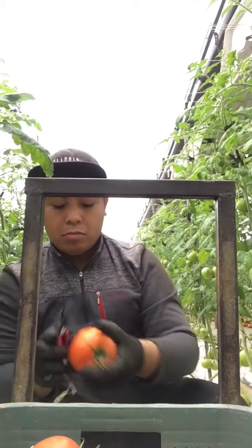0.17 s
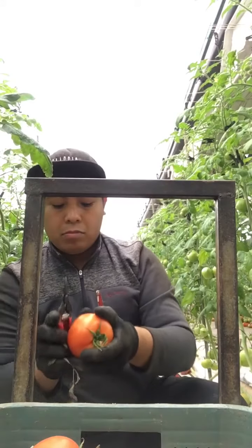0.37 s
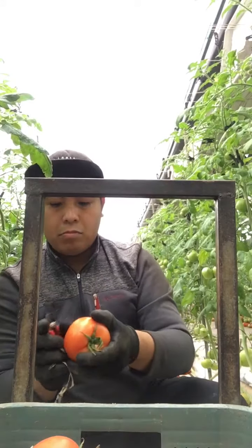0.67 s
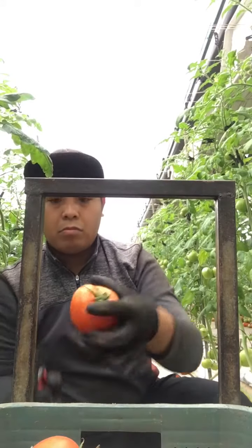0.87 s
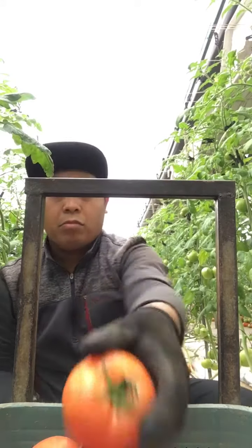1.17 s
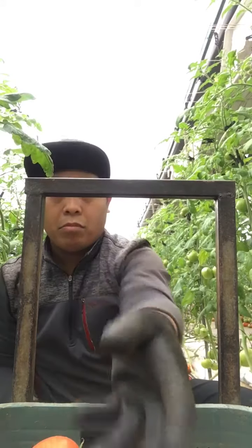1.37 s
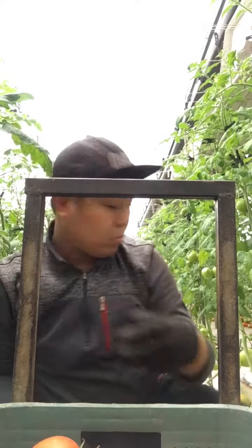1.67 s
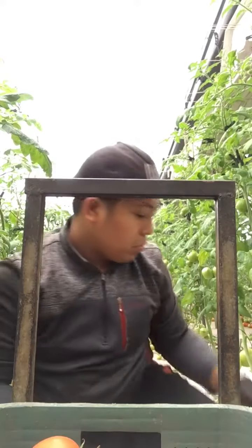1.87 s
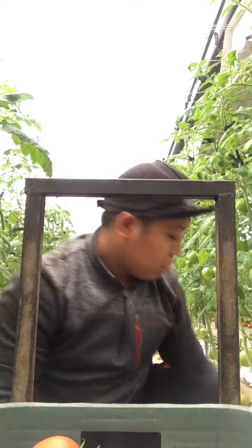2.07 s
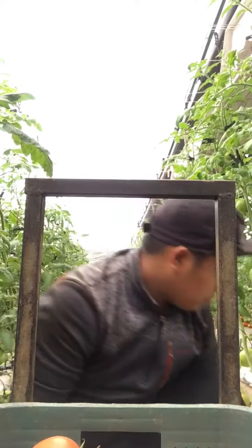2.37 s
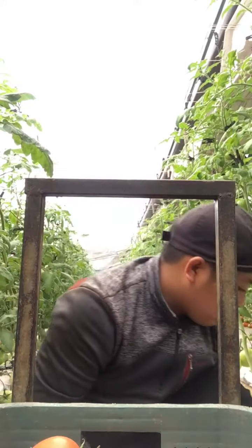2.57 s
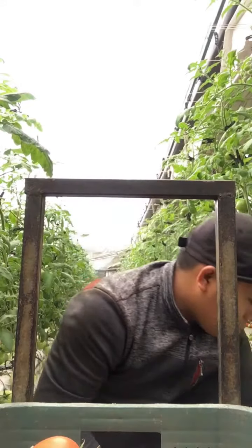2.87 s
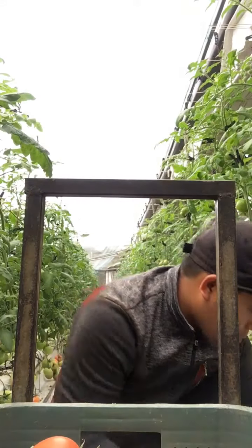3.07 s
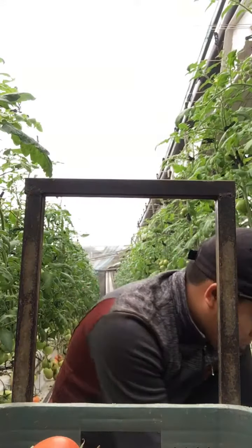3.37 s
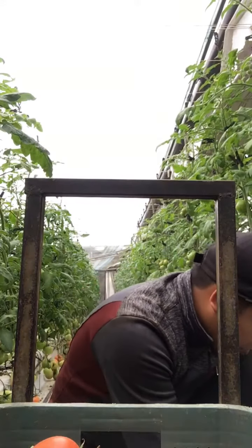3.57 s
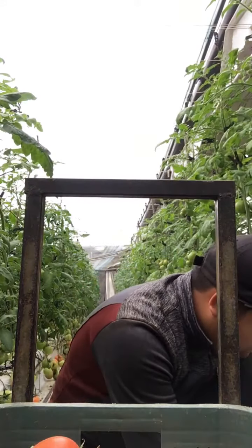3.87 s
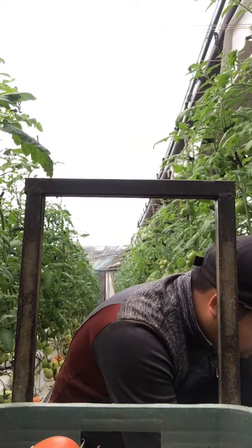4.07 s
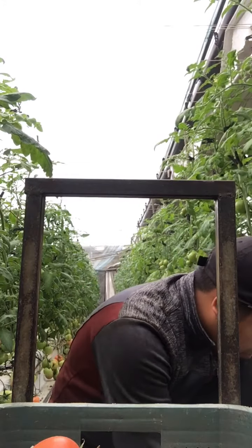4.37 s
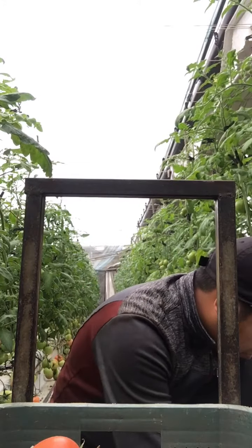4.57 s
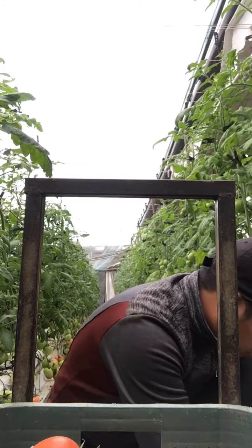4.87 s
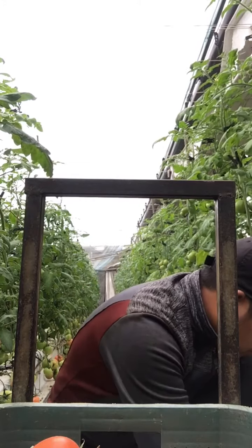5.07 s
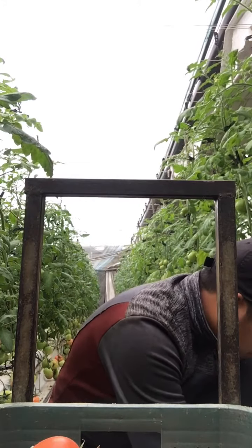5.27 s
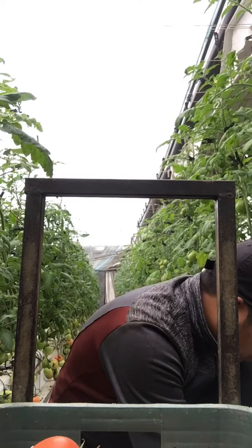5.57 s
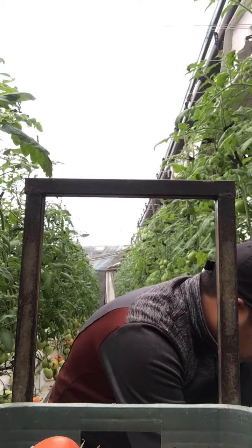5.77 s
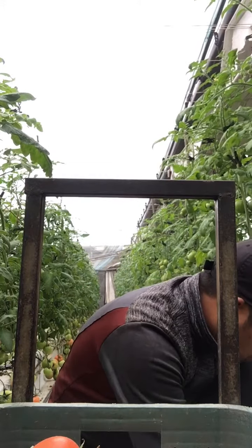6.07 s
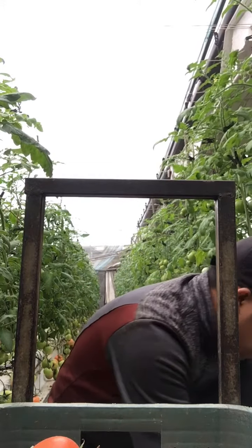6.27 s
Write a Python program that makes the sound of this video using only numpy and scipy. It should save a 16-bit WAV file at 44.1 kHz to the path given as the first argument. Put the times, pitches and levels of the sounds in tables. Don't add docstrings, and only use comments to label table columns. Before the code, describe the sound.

A low, steady fan hum with lumpy rumble runs throughout a greenhouse, picked up close by a phone resting on a plastic crate. From 0 to 1.3 s gloves and sleeves rub softly, with small dry ticks at 0.3 and 0.7 s and a sharper one at 1.3 s. A stalk taps at 1.4 s, then a tomato lands: a deep boomy thud peaking near 1.5 s, the crate chattering in weaker knocks until about 1.7 s. Glove scrapes follow to 2.0 s. From 2.3 to 3.25 s the whole background sinks, with faint leaf rustle, then returns with a light tick. At 4.2 s shears snip: a bright snapping crack with brief blade ring. Leaf brushing, slides and ticks fill 4.3 to 5.2 s, then quieter rustling. A second crisp snip falls at 6.02 s, followed by a last leafy brush around 6.27 s.

```python
import sys
import numpy as np
from scipy import signal
from scipy.io import wavfile
from scipy.ndimage import uniform_filter1d

SR = 44100
rng = np.random.default_rng(int(sys.argv[2]) if len(sys.argv) > 2 else 0)


def waveform_to_disk(signal):
    frames = np.transpose(np.atleast_2d(signal))
    scaled = np.clip(frames, -1, 1) * 32767
    samples = np.round(scaled).astype(np.int16)
    wavfile.write(sys.argv[1], SR, samples)


def magnitude_from_level(level_db):
    exponent = np.asarray(level_db, float) / 20
    return 10 ** exponent


N = 282681
DIP_DB = -9


def evened(x):
    return x / np.sqrt(np.mean(x ** 2) + 1e-20)


def read(points, hz):
    f, value = np.transpose(points)
    return np.interp(np.log(hz + 1), np.log(f + 1), value)


def add(mix, s, sound):
    part = mix[round(s * SR):][:len(sound)]
    part += sound[:len(part)]


def noise(field_db, size):
    hz = np.fft.rfftfreq(size, 1 / SR)[:, None]
    t = np.arange(4 * N // size + 5) * size / 4 / SR
    a, b = rng.standard_normal((len(t), len(hz), 2)).T
    gain = magnitude_from_level(field_db(hz, t))
    return signal.istft((a + 1j * b) * gain, nperseg=size, noverlap=3 * size // 4)[1][:N]


def dip(t):
    from_s, to_s, edge_s = 2.3375, 3.2535, 0.02
    return np.clip(np.minimum(t - from_s, to_s - t) / edge_s + .5, 0, 1)


def port_db(hz):
    # pitch_hz [Hz], width_hz [Hz], level_db [dB]
    resonances = [(1902, 480, -2.5), (2650, 470, 3.5), (4500, 330, 5), (4890, 280, -5), (6310, 720, 5),
                  (8890, 420, 5), (10460, 540, -13.5)]
    return sum(db / (1 + (2 * (hz - f) / w) ** 2) for f, w, db in resonances)


def hum():
    # pitch_hz [Hz], density_db [dB per Hz]
    fan_colour = [(30, -33), (70, -14.5), (115, -10.5), (190, -13.5), (300, -19), (450, -22), (800, -21.5),
                  (1030, -20.5), (1300, -25), (2000, -30.5), (3200, -43.5), (6400, -51.5), (9000, -55),
                  (16000, -58)]
    # middle_s [s], extra_db [dB], half_width_s [s]
    gusts = [(.2, 4, 0.22), (.8, 1, .15), (1.41, 0.5, 0.086), (1.62, 11, 0.14), (1.88, 1.5, 0.13),
             (2.25, -2, 0.11), (3.26, 5, .06), (3.6, 2, .15), (5.1, 3, 0.54), (5.82, 2, 0.13),
             (6.41, 6, 0.17)]
    fans_db, rumble_db = -55.5, -54.0
    fans = noise(lambda hz, t: read(fan_colour, hz) + .25 * port_db(hz), size=2048)
    rumble = noise(lambda hz, t: -24 * np.log2((hz + 1) / 56) ** 2, size=8192)
    t = np.arange(N) / SR
    gusts_db = sum(db * np.exp(-((t - s) / wide) ** 2) for s, db, wide in gusts)
    air = magnitude_from_level(fans_db) * evened(fans) + magnitude_from_level(rumble_db + gusts_db) * evened(rumble)
    return magnitude_from_level(DIP_DB * dip(t)) * air


def stroke(t, s, db, rise, hold, fall):
    climb_db = 20 * np.maximum((s - t) / rise, 0)
    fade_db = 20 * np.maximum((t - s - hold) / fall, 0)
    return magnitude_from_level(2 * db - climb_db - fade_db)


def movements(t):
    # full_s [s], level_db [dB], rise_s [s per 10 dB], hold_s [s],
    # fall_s [s per 10 dB]
    strokes = [(0, -65, .01, .085, .02), (.14, -68, .015, .1, 0.26), (.31, -63, .04, .015, 0.16),
               (.72, -67, .1, .1, .4), (1.28, -57, 0.1, .025, .018), (1.403, -54, 0.04, .07, 0.03),
               (1.484, -51, .02, 0.028, 0.1643), (1.804, -64.5, 0.3, .005, 0),
               (1.898, -51, 0.0047, 0.013, .01), (1.86, -59, .03, .02, .03),
               (2.017, -65.5, 0.25, 0.0045, 0.06), (2.202, -67, .4, .12, .004)]
    # full_s [s], level_db [dB], rise_s [s per 10 dB],
    # hold_s [s], fall_s [s per 10 dB]
    brushes = [(2.754, -73.5, .05, .005, .04), (2.9, -64.5, 0.085, .01, 0.057),
               (3.3, -67.5, 0.018, .01, 0.26), (4.19, -64, .06, .03, .05), (4.265, -55, .06, 0.0079, 0.076),
               (4.3, -55.5, 0.026, 0.2, 0.024), (4.64, -52, 0.027, .008, 0.023),
               (4.745, -55.5, 0.014, .03, .03), (4.832, -51, 0.015, .005, 0.026),
               (4.475, -55, 0.027, .012, .025), (5.99, -62, .01, .03, .05), (6.07, -53.5, .05, .01, 0.07),
               (6.15, -65, .05, .05, .05), (6.265, -50.5, 0.058, 0.0088, .04)]
    # full_s [s], level_db [dB], rise_s [s per 10 dB], hold_s [s],
    # fall_s [s per 10 dB]
    slides = [
        (.65, -66, .06, .06, .015),
        (1.22, -63, .02, .01, .05),
        (1.955, -47.5, .014, .028, .018),
        (3.048, -71, .08, .005, .05),
        (4.92, -54.5, .03, .035, .04),
        (5.19, -53, .06, .02, .033),
    ]
    # full_s [s], level_db [dB], fall_ms [ms per 10 dB]
    flicks = [(.075, -55, 12), (.135, -60, 16), (.182, -56, 18), (.3, -61, 18), (.562, -58.5, 9),
              (.712, -49.5, 5), (.825, -63, 18), (2.318, -63, 8), (2.445, -74, 16), (3.275, -54.5, 25),
              (3.574, -67, 25), (3.864, -59, 19.5), (5.0, -57.5, 23), (5.088, -58, 14), (5.142, -52, 15),
              (5.462, -67, 14), (5.493, -68, 14), (5.712, -69, 60), (5.878, -66, 42)]
    held = [sum(stroke(t, *row) for row in rows) for rows in (strokes, brushes, slides)]
    flicked = sum(stroke(t, s, db, 0.0058, 0, fall_ms / 1e3) for s, db, fall_ms in flicks)
    stir_db = -73.5 + 1.26 * DIP_DB * dip(t)
    return np.array([magnitude_from_level(2 * stir_db), *held, flicked])


def rubs():
    # pitch_hz [Hz], level_db [dB]
    rub_colour = [(600, -13), (1200, 0), (2500, 3), (3600, -2), (5400, -2), (7000, -7), (9000, -12.5),
                  (11500, -15.5), (13000, -22.5), (16000, -21)]
    tilts_db = [-0.7, -0.44, -1.3, 1.6, -1.5]
    leaf_body_db, stroke_body_db, slide_body_db = -4.3, -2.5, 1.5

    def field(hz, t):
        patches = rng.standard_normal((len(t), len(hz))).T
        patches = uniform_filter1d(patches, size=3, axis=0)
        patches = evened(uniform_filter1d(patches, size=20, axis=1))
        flicker = evened(uniform_filter1d(rng.standard_normal(len(t)), size=2))
        powers = movements(t)
        share = powers / powers.sum(0)
        tilt = np.dot(tilts_db, share) * np.log2(np.maximum(hz, 2000) / 4000)
        body_db = leaf_body_db + (stroke_body_db - leaf_body_db) * share[1]
        body_db = body_db + (slide_body_db - leaf_body_db) * share[3]
        body = body_db / (1 + (hz / 2100) ** 6)
        return read(rub_colour, hz) + tilt + body + 2.3 * patches + 1.76 * flicker

    t = np.arange(0, N + 32, 32) / SR
    level = np.interp(np.arange(N) / SR, t, np.sqrt(movements(t).sum(0)))
    return magnitude_from_level(-2.5) * level * evened(noise(field, size=256))


def pop(t, hz, swell):
    return np.sin(2 * np.pi * hz * t) * (t / swell * np.exp(1 - t / swell)) ** 2


def ticks():
    # start_s [s], peak_db [dB], pitch_hz [Hz], hiss_db [dB]
    tick_events = [(0.07, -54, 4500, 0), (0.125, -52, 2090, -1), (0.1815, -47.5, 2720, -1),
                   (0.2847, -40.5, 1500, -23), (0.5596, -49.5, 2700, -5), (0.63, -49, 1820, -12),
                   (0.681, -47.5, 2780, -2), (0.7086, -45.5, 6250, -4), (1.0914, -61, 1460, -7),
                   (1.3029, -36.5, 2770, -10), (1.7963, -46, 2570, -6), (1.8761, -41.5, 1300, 0),
                   (1.9139, -44, 2660, -4), (2.3166, -53, 1730, -7), (3.2607, -43.5, 4000, 1.5),
                   (3.5734, -54, 5300, 1), (3.8646, -48, 3840, 1), (4.9674, -50, 3020, 1),
                   (5.002, -56, 1450, 0), (5.0877, -45.5, 1350, 1.5), (5.1366, -39, 2850, -13),
                   (5.1746, -39.5, 4600, -1), (5.4644, -52, 1650, 3), (5.491, -50, 3000, -3),
                   (6.3639, -49.5, 3000, -6)]
    t60_s, rise_s = 0.049, 0.00055
    out, t = np.zeros(N), np.arange(4000) / SR
    thin_band = signal.butter(2, [1800, 9000], "band", fs=SR, output="sos")
    hisses = rng.standard_normal((len(tick_events), len(t)))
    for (s, db, hz, hiss_db), hiss in zip(tick_events, hisses):
        hump = evened(signal.lfilter(*signal.iirpeak(hz, 5.5, SR), hiss))
        thin = signal.sosfilt(thin_band, hiss)
        envelope = magnitude_from_level(-12 - 60 * t / t60_s) * (1 - np.exp(-t / rise_s))
        burst = envelope * (hump + magnitude_from_level(hiss_db) * thin)
        add(out, s, magnitude_from_level(db) * (burst + 0.56 * pop(t, hz, 1.1 / hz)))
    return out


def stalk_and_shears():
    # start_s [s], peak_db [dB], pitch_hz [Hz], swell_s [s],
    # crack_db [dB]
    snaps = [(1.3958, -31, 1240, 0.0011, -12), (4.2066, -36, 4500, .0006, 1),
             (4.2092, -26.5, 4720, 0.00051, -3.5), (4.2167, -18, 3280, 0.00064, -4.5),
             (4.2182, -23, 3540, 0.00028, -1), (4.2216, -29, 3750, 0.00074, 0),
             (6.009, -51, 4000, 0.0008, 7.5), (6.013, -42, 1980, 0.0011, -1),
             (6.0146, -41, 4000, 0.00076, 4), (6.019, -38, 6270, 0.00098, -10),
             (6.023, -19, 2985, 0.00092, -11), (6.0255, -22, 3370, 0.00038, -2),
             (6.0302, -34, 3250, 0.00073, 0)]
    # pitch_hz [Hz], level_db [dB], t60_s [s]
    blade_modes = [(520, -30, .025), (1040, -23.5, .035), (1910, -24.5, 0.034), (2800, -25.5, .07),
                   (3315, -26, .05), (4550, -29, 0.086)]
    out, t = np.zeros(N), np.arange(4000) / SR
    high = signal.butter(2, 1500, "high", fs=SR, output="sos")
    low = signal.butter(1, 5500, fs=SR, output="sos")
    hisses = signal.sosfilt(np.vstack([high, low]), rng.standard_normal((len(snaps), len(t))))
    blades = sum(magnitude_from_level(db - 60 * t / t60) * np.sin(2 * np.pi * hz * t) for hz, db, t60 in blade_modes)
    for (s, db, hz, swell, crack_db), hiss in zip(snaps, hisses):
        crack = hiss * magnitude_from_level(crack_db - 60 * t / 0.045)
        add(out, s, magnitude_from_level(db) * (pop(t, hz, swell) + blades + crack))
    return out


def ring(modes, weights, t):
    hz, db, t60 = np.transpose(modes)[:, :, None]
    sines = magnitude_from_level(db - 60 * t / t60) * np.sin(2 * np.pi * hz * t)
    x = (weights[:, None] * sines).sum(0)
    return x / abs(x).max()


def crate():
    # start_s [s], panel_db [dB], walls_db [dB], crack_db (skin) [dB],
    # damping [dB per ms]
    blows = [(1.423, -43, -28, -47, 1.5), (1.43, -8.5, -28.5, -57, 0.9), (1.442, -21, -32.5, -47, 0.3),
             (1.486, -14.5, -16.5, -25.5, 2), (1.495, 0, -15.5, -45, 1), (1.505, -9.5, -27, -47.5, 0.3),
             (1.516, -12, -21, -45, 0.5), (1.529, -15, -25, -40, 2), (1.566, -23, -31, -48, 4),
             (1.571, -12, -32.5, -57, 0.3), (1.583, -17, -35.5, -55, 1.4), (1.588, -18, -25.5, -47, 0.2),
             (1.601, -9, -26, -49, 1.1), (1.616, -28, -33, -50, 1), (1.63, -15.5, -45, -51, 1.2),
             (1.646, -36, -58, -51, .3), (1.659, -21, -62, -56, 2.5), (1.675, -38, -62, -63, 1),
             (3.259, -47, -55, -50, 0.4), (3.276, -43.5, -61, -57, .2)]
    # pitch_hz [Hz], level_db [dB], t60_s [s]
    panel_modes = [(65.7, -1.5, 0.34), (116, -8, 0.4), (146, 7, 0.29), (211.4, 0, 0.4), (285, -15.5, 0.48),
                   (304, -3, 0.27), (346, -12, .4), (395.2, -2, 0.2)]
    # pitch_hz [Hz], level_db [dB], t60_s [s]
    wall_modes = [(576, -3, 0.15), (727, -6.5, 0.094), (826, -0.5, 0.067), (953, 0, 0.034),
                  (1107, -5.5, 0.031), (1300, -6.5, 0.034), (1500, -6, 0.03)]
    # pitch_hz [Hz], level_db [dB], t60_s [s]
    free_modes = [(66.2, -6.5, 0.2), (113, -12.5, 0.25), (146.5, 1, 0.3), (213.4, -2.5, 0.21),
                  (278.4, -12, 0.55), (352.6, -14, .45), (395, -3, 0.12), (573.7, -8, 0.18),
                  (810, -12.5, .12)]
    out, t = np.zeros(N), np.arange(SR // 4) / SR
    place = rng.standard_normal((len(blows), len(panel_modes) + len(wall_modes) + len(free_modes)))
    place = np.sign(place) * magnitude_from_level(2.78 * abs(place))
    band = signal.butter(2, [1400, 3300], "band", fs=SR, output="sos")
    cracks = signal.sosfilt(band, rng.standard_normal((len(blows), len(t))))
    octaves = np.log2([hz / 180 for hz, db, t60 in panel_modes])
    push = 1 - np.exp(-t / 0.0028)
    for (s, panel_db, walls_db, crack_db, grip), weights, crack in zip(blows, place, cracks):
        panel, walls, free = np.split(weights, [len(panel_modes), -len(free_modes)])
        damping = magnitude_from_level(-grip * 1000 * t)
        hardness = magnitude_from_level((2.5 + .12 * panel_db) * octaves)
        thud = ring(panel_modes, abs(panel) * hardness, t) * damping
        thud = thud + magnitude_from_level(-20.5) * ring(free_modes, abs(free), t)
        knock = ring(wall_modes, walls, t) * (damping + .15)
        blow = magnitude_from_level(panel_db + 5.5) * push * thud + magnitude_from_level(walls_db + 3.5) * knock
        add(out, s, blow + magnitude_from_level(crack_db + 11.0 - 60 * t / 0.029) * crack)
    return signal.sosfilt(signal.butter(2, 55, "high", fs=SR, output="sos"), out)


def house(x):
    # pitch_hz [Hz], t60_s [s]
    decay = [(300, 0.26), (2000, 0.067), (5000, 0.16), (10000, 0.19), (16000, 0.035)]
    taps = np.zeros(SR // 2)
    at = np.arange(100, len(taps) - 20, 20)
    taps[at + rng.integers(0, 20, len(at))] = rng.choice([-1., 1.], len(at))
    hz, t, z = signal.stft(taps, SR, nperseg=128)
    fading = magnitude_from_level(-60 * t / read(decay, hz)[:, None])
    tail = signal.istft(z * fading, SR, nperseg=128)[1]
    return signal.fftconvolve(x, tail / np.linalg.norm(tail))[:N]


def port(x):
    log_gain = np.log(magnitude_from_level(port_db(abs(np.fft.fftfreq(4096, 1 / SR)))))
    taps = np.fft.ifft(np.exp(np.conj(signal.hilbert(log_gain)))).real[:2048]
    return signal.oaconvolve(x, taps)[:N]


def scene():
    snips, knocks = stalk_and_shears(), crate()
    near = snips + rubs() + ticks()
    near = near + house(magnitude_from_level(-10.5) * snips + magnitude_from_level(-14) * knocks)
    return (port(near) + knocks + hum())[None]


def roll_off(x):
    return signal.sosfilt(signal.butter(12, 16650, fs=SR, output="sos"), x)


def record(dry):
    dry = dry + magnitude_from_level(-84.5) * rng.standard_normal(dry.shape)
    dry = signal.sosfilt(signal.butter(4, 40, "high", fs=SR, output="sos"), dry)
    edge = signal.firwin(511, 15750, window=("kaiser", 7), fs=SR)
    mix = signal.oaconvolve(dry, edge[None], "same")
    return roll_off(mix)


dry = scene()
out = record(dry)
waveform_to_disk(out)
```